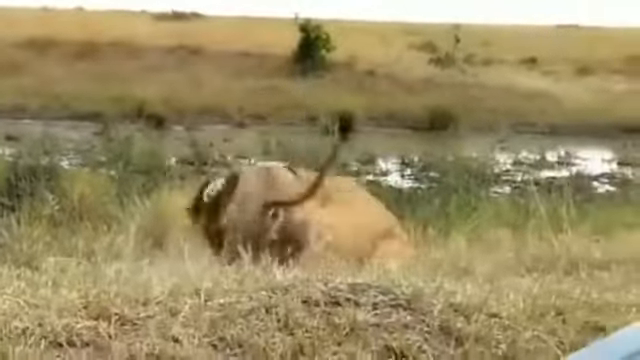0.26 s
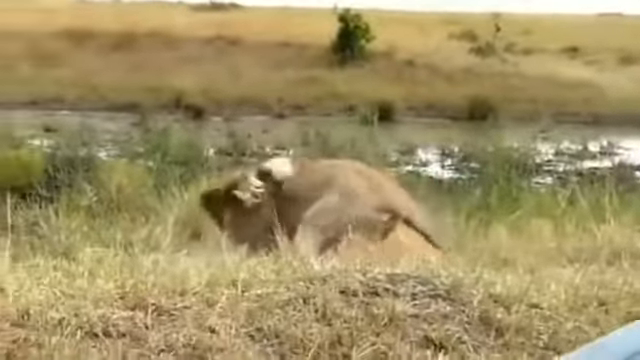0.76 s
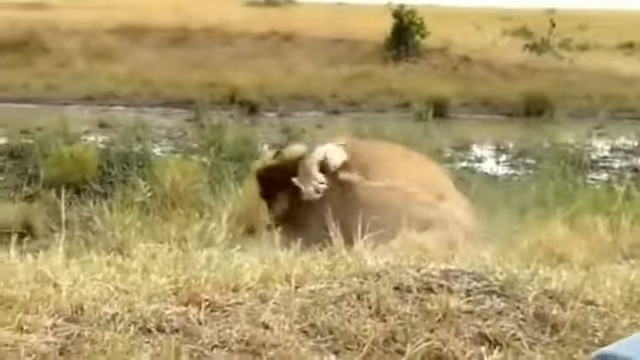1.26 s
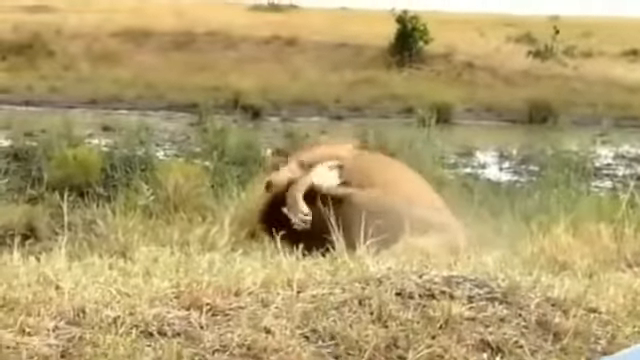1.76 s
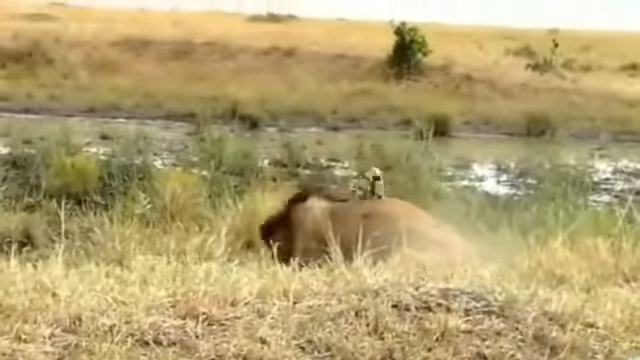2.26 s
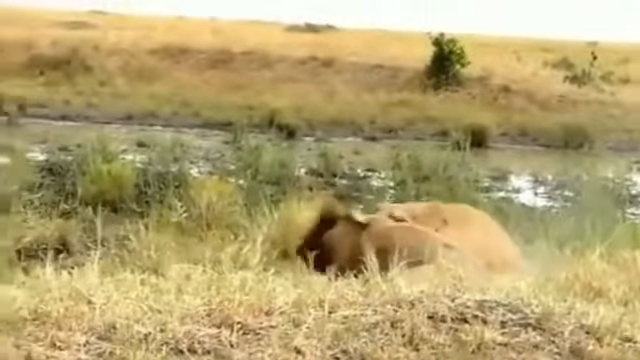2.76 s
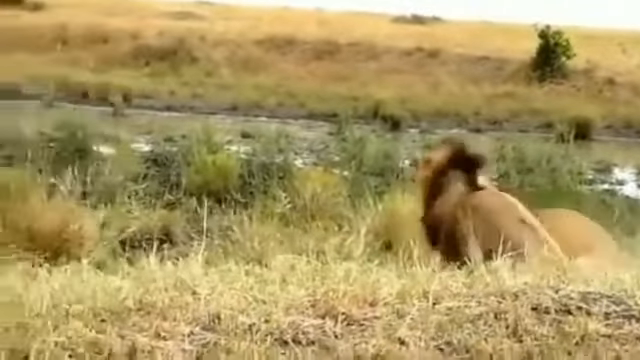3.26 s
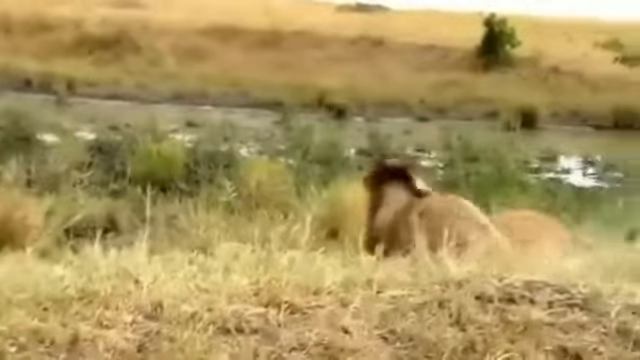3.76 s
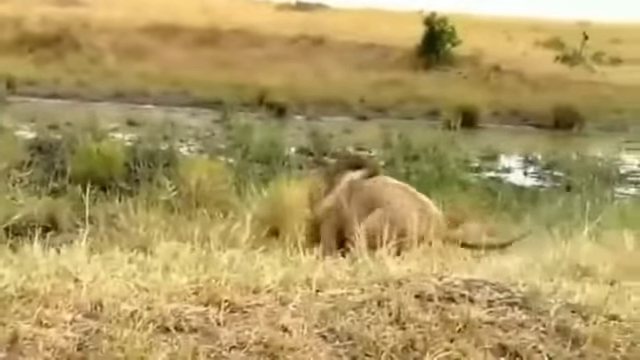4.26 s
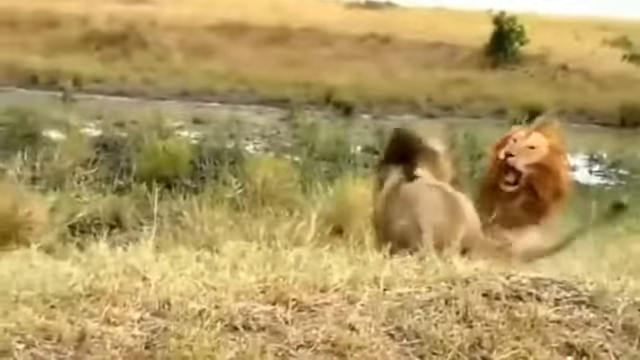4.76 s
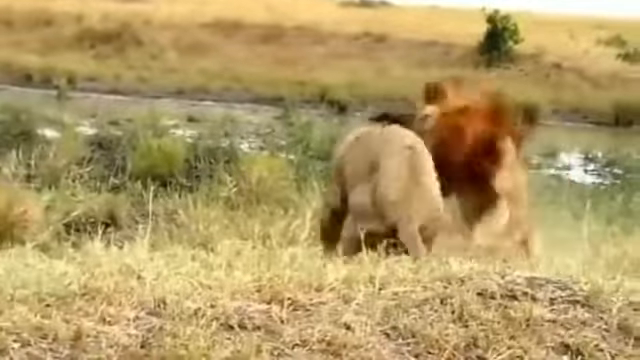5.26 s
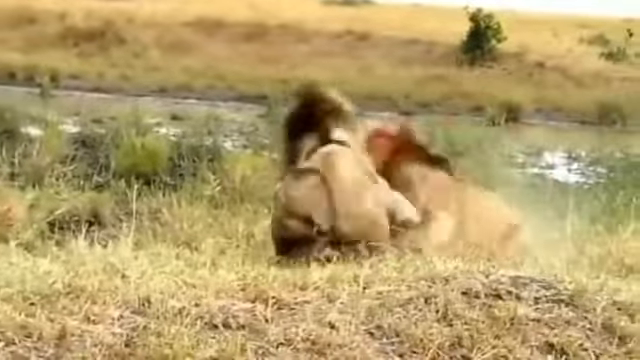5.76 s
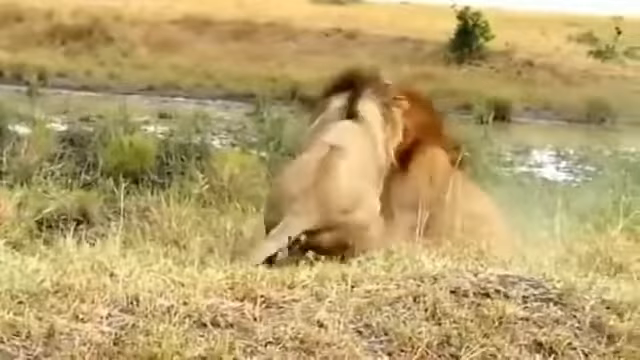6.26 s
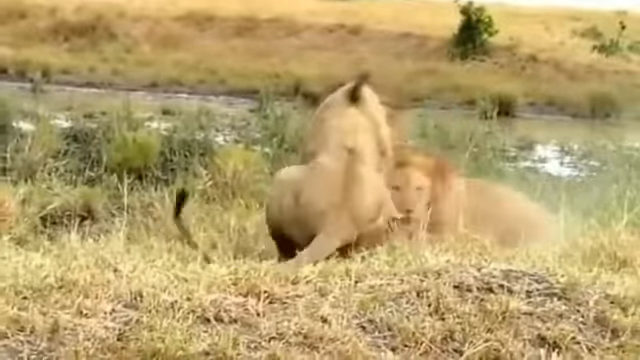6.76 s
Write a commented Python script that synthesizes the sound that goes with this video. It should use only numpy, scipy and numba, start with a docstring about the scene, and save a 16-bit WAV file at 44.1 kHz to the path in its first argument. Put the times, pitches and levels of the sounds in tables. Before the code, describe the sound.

A distant, muffled outdoor capture of fighting big cats. Growls come almost without pause: rough bursts at first, a brief clean rattle, then dense torn roars with yelping, moaning tones. Slow deep rattles follow, with sharp little crackles and brief spitting hisses, before a short dip and more pulsing growls. It ends in strained, raspy snarls and overlapping wails over soft low air noise.

```python
"""Lions fighting on grassland

Two lions fight on open grassland, some way off.
Slow slaps of the vocal folds, now a clean rattle and now a torn roar, ring filters for chest, throat and mouth.
Harmonic moans and wails ride on the growling, with jets of filtered noise for hisses and short bursts for crackles.
The ground adds dull echoes; steady shaped noise lies underneath as a faint hiss and rumble.
"""
import sys
import numpy as np
from scipy import signal
from scipy.fft import rfft, irfft, next_fast_len
from scipy.io import wavfile
from scipy.ndimage import uniform_filter1d, minimum_filter1d
from numba import njit

SR = 44100
rng = np.random.default_rng(int(sys.argv[2]) if len(sys.argv) > 2 else 0)


def master_out(mix):
    """Clip the mix to full scale and print it as 16-bit PCM to the path in sys.argv[1]."""
    frames = np.transpose(np.atleast_2d(mix))
    ceiling = np.clip(frames, -1, 1)
    pcm = np.round(ceiling * 32767).astype(np.int16)
    wavfile.write(sys.argv[1], SR, pcm)


N = 309313
TIME = np.arange(N) / SR
RATTLE_HOLD_S, ROAR_HOLD_S = .085, .03   # windows that even out the level

# one row per stretch of growling, in order of time; a long rattle runs over several rows:
#   (start [s], length [s], fold slaps at start [per s], at end [per s],
#   roughness [0-1], level [dB], swell over its length [dB], jaw opening at start [0-1], at end [0-1],
#   chest pitch at start [Hz], at end [Hz], mouth pitch at start [Hz], at end [Hz],
#   tract damping [factor], depth [dB], hollowness [dB], curl of the lips [dB], rasp [dB])
GROWL_STRETCHES = [ (0, 0.12, 62, 78, 0.56, -18.5, -9, 0.66, 0.71, 327, 298, 715, 654, 0.69, -25, -14, -9, -1),
                   (0.127, 0.19, 68, 59, 0.76, -29.5, 1, 0.82, 0.5, 288, 248, 630, 640, 1.4, -7, -6, 5, -11),
                   (.267, .124, 56, 56, .3, -19.5, 5, .55, .48, 224, 190, 700, 720, 1.1, -3, 0, -8, -6),
                   (.392, .112, 43, 46, .18, -18, 0, .6, .66, 226, 205, 720, 720, 1, 0, -2, -8, -7),
                   (0.503, 0.21, 55.5, 68, 0.52, -14, -1.5, 0.48, 0.62, 178, 235, 727, 734, 1.07, -11, -3.5, -13, -0.5),
                   (0.743, .19, 44.6, 46.5, 0.41, -24, -3, 0, 0, 198, 226, 700, 690, 0.36, -13, -1, -5, 2),
                   (0.926, 0.24, 43.7, 50, 0.38, -22.5, 1.5, 0.64, 0.24, 191, 221, 643, 660, 1.2, -2.5, -14, -7, -8),
                   (1.036, 0.16, 74, 46, 0.66, -31, 19.5, 0, 0.45, 221, 206, 710, 753, 0.89, -1.5, -2, 18.5, 2),
                   (1.145, 0.2165, 79, 69.4, 0.63, -23.5, -0.5, 0.86, 0.36, 304, 296, 770, 760, 2.3, -24, -24, 17.5, -6),
                   (1.378, .095, 29.9, 32.8, .06, -23.5, -2, .28, .28, 310, 320, 700, 700, .75, -14, -17, -11, -12),
                   (1.4735, .09, 31, 23.2, .08, -25, -9, .36, .42, 320, 335, 740, 740, .8, -12, -17, -11, -12),
                   (1.589, 0.11, 64, 78, 0.65, -16, 9, 0.54, .7, 193, 236, 753, 720, 0.92, -12, -9.5, -5, 1),
                   (1.738, 0.2, 71, 81, 0.72, -21.5, -9.5, 0.63, 0.69, 234, 263, 733, 655, 0.83, -4.5, -6.5, 4.5, 1),
                   (1.929, 0.14, 77, 70, 0.65, -25.5, 7.5, 0.25, 0.51, 232, 260, 674, 670, 2.4, -14, -10, 1.5, 7.5),
                   (2.106, 0.23, 71.5, 125, 0.77, -21.5, 6, 0.6, 0.62, 296, 239, 650, 646, 0.62, 0.5, -6, 0, 2.5),
                   (2.284, 0.18, 61.5, 82, 0.81, -20, 1.5, 0.36, 0.75, 258, 268, 626, 695, 0.67, 1, -4.5, 1, 0.5),
                   (2.471, 0.043, 65, 54, 0.62, -27, 7, 0.75, 1, 277, 272, 696, 710, 0.6, -17, 4.5, 11, 7.5),
                   (2.557, 0.13, 92, 80, 0.76, -24, 3, 0.94, 0.82, 340, 350, 680, 723, 0.86, -9.5, -10.5, 8.5, 0),
                   (2.747, 0.2, 116, 93, 0.83, -23, -3, 0.46, 0.66, 186, 213, 710, 687, 1.3, -11.5, -1.5, 10.5, 5.5),
                   (2.918, 0.19, 95, 91, 0.62, -30.5, 7, 0.92, 1, 306, 234, 733, 740, 0.78, -12.5, -38, 3.5, -1),
                   (3.1, 0.44, 55.4, 49.6, 0.63, -26, -4.5, 0.76, 0.26, 228, 182, 783, 670, 0.62, 0, -1, 6, 5),
                   (3.437, .107, 38, 36.6, .25, -25, 4, .16, .1, 216, 225, 640, 620, 1, 1, 7, 2, 0),
                   (3.544, .123, 40.5, 40.6, .2, -21.5, -2, .1, .05, 200, 240, 620, 600, 1, 1, 8, 2, 0),
                   (3.667, .21, 41, 41.5, .2, -19, 4, .08, .12, 245, 206, 680, 650, .7, -2, -5, 0, -2),
                   (3.871, 0.29, 55.5, 60, 0.6, -18.5, -15.5, 0.45, 0.78, 296, 233, 724, 575, 1.4, -3, -16, 6.5, -1),
                   (4.148, 0.14, 50, 38.6, 0.56, -27, -13, 0.43, 0.52, 188, 179, 640, 567, 1.2, 5, -17, -2, -11),
                   (4.355, 0.29, 46, 43.5, 0.86, -25, 8.5, 0.69, 0.53, 182, 185, 584, 580, 1.2, 3, -26, 5.5, 2),
                   (4.6025, .128, 37.5, 40.2, .08, -19, 0, .6, .5, 258, 240, 730, 765, 1, -4, -3, -9, 6),
                   (4.7308, .136, 38.8, 34.6, .06, -19, 0, .5, .46, 232, 232, 770, 780, .85, -5, -3, -10, 6.5),
                   (4.867, .169, 31.5, 39.3, .36, -16.5, 1.5, .32, .6, 226, 218, 700, 760, .9, -4, -1, -6, 4.5),
                   (5.036, .087, 37.5, 31.3, .2, -21, 0, .52, .47, 205, 247, 720, 700, 1, -4, -2, -5, 5),
                   (5.123, .1, 95, 110, .85, -27.5, -6, .85, .6, 295, 290, 770, 680, 1, -4, -3, -1, -5),
                   (5.222, 0.05, 50, 49, 0.7, -37, -6, 0.06, 0, 245, 255, 740, 704, 1.9, 8.5, 6, 18, 9),
                   (5.403, .048, 43, 40, .12, -28.5, 7, .22, .3, 208, 215, 690, 690, .8, -5, -9, -3, 1),
                   (5.451, .05, 38, 38, .08, -21.5, -6, .25, .2, 215, 215, 690, 690, .6, -7, -9, -5, -3),
                   (5.5, 0.028, 32.3, 43, 0.9, -28.5, 2.5, 0.5, 0.72, 197, 200, 600, 620, 0.35, 1, -5, 12, 1),
                   (5.527, .115, 41, 45.8, .08, -16, 2, .16, .22, 200, 182, 540, 680, .5, -6, -1, -6, -5),
                   (5.642, .05, 40.6, 38.8, .04, -16, 0, .3, .38, 186, 196, 700, 800, .55, -7, -4, -7, 2),
                   (5.6922, .096, 38.6, 44.5, .04, -16, 0, .38, .36, 198, 218, 835, 740, .6, -8, -4, -8, 2),
                   (5.7885, .17, 45, 37.2, .05, -18.5, -9, .14, .42, 222, 228, 750, 560, .7, -10, 1, -6, -2),
                   (5.961, 0.18, 44, 53, 0.66, -28.5, -3, 0.28, 0.8, 188, 205, 683, 860, 1.5, 3, -2.5, 8.5, -1),
                   (6.119, .1, 60, 70, .8, -30, -5, .3, .5, 212, 240, 850, 840, 1.2, 4.5, -7, 9, 4),
                   (6.28, .275, 71, 55, .92, -28, 3, .48, .68, 266, 332, 835, 850, .93, 3, -8, 13.5, 11),
                   (6.557, 0.3, 94, 157, 0.81, -28.5, -0.5, 0.57, 0.53, 367, 346, 810, 810, 1.15, 12, -0.5, 16.5, 14.5),
                   (6.842, 0.18, 108, 133, 0.93, -22, -4, 0, 1, 360, 340, 725, 710, 0.54, 2, -5, 10.5, 6)]


def from_db(db):
    """Decibels to gain."""
    return 10 ** (np.asarray(db) / 20)


def rms_one(x):
    """Scale to an rms of 1."""
    return x / np.sqrt(np.mean(x ** 2) + 1e-20)


def glide(first, last, share):
    """A straight move from one value to another."""
    return first + (last - first) * share


def drift(rate_hz):
    """Slow chance with an rms of 1: noise low-passed on a coarse grid, then joined by straight lines."""
    step = 40   # samples between grid points
    pole = np.exp(-2 * np.pi * rate_hz * step / SR)
    noise = rng.standard_normal(N // step + 2002)
    slow = signal.lfilter([1], [1, -2 * pole, pole * pole], noise)[2000:]   # drop the run-in
    return np.interp(np.arange(N) / step, np.arange(len(slow)), rms_one(slow))


def cut(x, hz, kind, order):
    """Butterworth low-pass or high-pass, run both ways so that a slap stays compact."""
    margin = SR // 20
    sos = signal.butter(order, min(hz, SR / 2 - 1), kind, fs=SR, output="sos")
    return signal.sosfiltfilt(sos, np.pad(x, margin), padtype=None)[margin:-margin]


def evened(x, hold_s=RATTLE_HOLD_S):
    """Hold the level near 1 over a short window, keeping the faster slaps within it."""
    window = np.hanning(int(hold_s * SR))
    power = signal.fftconvolve(x ** 2, window / window.sum(), "same")
    return x / np.sqrt(np.abs(power) + 1e-14)


@njit
def resonate(x, hz, width, sr):
    """A ringing resonance, one decaying complex rotation, whose centre and width move."""
    out, state = np.zeros(len(x)), 0j
    for i in range(len(x)):
        w = 2 * np.pi * hz[i] / sr
        state = state * np.exp(-np.pi * width[i] / sr) * complex(np.cos(w), np.sin(w)) + x[i]
        out[i] = state.real
    return out


def noise_bed(level_db=-38):
    """A steady noise bed: shaped into a low rumble and a faint hiss."""
    # colour of the noise bed: (frequency [Hz], relative level [dB])
    air_colour = [(20, -8), (40, -7.5), (70, 1.5), (130, 11), (400, 11), (1500, -9.5), (3000, -26.5),
                  (5000, -34.5), (7800, -35), (9000, -52)]
    hz, db = np.transpose(air_colour)
    size = next_fast_len(N)
    bins = np.maximum(np.fft.rfftfreq(size, 1 / SR), 1)
    colour = from_db(np.interp(np.log(bins), np.log(hz), db))
    noise = irfft(rfft(rng.standard_normal(size)) * colour, size)[:N]
    return from_db(level_db) * rms_one(noise)


def grassland(x, dull_hz=1500, smear_hz=500):
    """Soft ground smears each slap a little and adds only a few dull echoes."""
    # dull returns from ground and bank: (delay [s], level [dB])
    returns = [(.0045, -14), (.071, -25), (.118, -28)]
    pole = np.exp(-2 * np.pi * smear_hz / SR)
    smeared = signal.lfilter([-pole, 1], [1, -pole], x)   # all-pass: the lows lag the highs
    dull = cut(smeared, dull_hz, "low", order=1)
    echoes = sum(from_db(db) * np.interp(TIME - delay, TIME, dull, left=0) for delay, db in returns)
    return smeared + echoes


def crackles():
    """Sharp crackles and snaps: each is a tiny dying noise burst through a bright band-pass."""
    # one row per snap: (time [s], peak level [dB], ring centre [Hz], ring width [Hz], burst decay [s])
    snaps = [ (4.602, -35, 2550, 550, 0.0034), (4.654, -39, 2890, 600, .003),
             (4.867, -42.5, 2850, 550, .002), (4.955, -35.5, 2460, 515, 0.0027),
             (5.036, -42, 2400, 700, .003), (5.063, -40, 1920, 350, .003), (5.091, -39, 2660, 350, .003),
             (5.122, -44, 2720, 404, 0.0025), (5.4393, -45, 2290, 2800, 0.00043),
             (5.743, -46, 2620, 453, .003)]
    out, t = np.zeros(N), TIME[:SR // 30]
    for start, db, hz, width, decay_s in snaps:
        band = np.clip([hz - width / 2, hz + width / 2], 100, SR / 2 - 1)
        burst = rng.standard_normal(len(t)) * np.exp(-t / decay_s)
        rung = signal.sosfilt(signal.butter(2, band, "band", fs=SR, output="sos"), burst)
        out[int(start * SR):][:len(t)] += from_db(db) * rung / np.abs(rung).max()
    return out


def hisses(flutter_db=6.0, fade_s=0.004):
    """Air spat through bared teeth: noise rings the same gliding resonance twice, and its level flutters."""
    # one row per jet: (start [s], length [s], level [dB], centre at start [Hz], at end [Hz],
    #   width of each resonance [Hz])
    jets = [ (0.178, 0.089, -59, 1850, 1730, 300), (0.509, 0.24, -47.5, 1240, 1360, 300),
            (1.479, 0.023, -46, 1000, 960, 90), (2.917, 0.11, -50.5, 2120, 1950, 220),
            (5.124, .08, -40, 1280, 1010, 150), (5.498, 0.089, -53.5, 1600, 1450, 700),
            (5.507, 0.018, -57.5, 2280, 2250, 200), (6.45, .55, -66, 3340, 3470, 1100)]
    out, flutter = np.zeros(N), from_db(flutter_db * drift(60))
    for start, length, db, first_hz, last_hz, width in jets:
        on = (TIME >= start) & (TIME <= start + length)
        t = TIME[on] - start
        hz = glide(first_hz, last_hz, t / length)
        widths = np.full(len(t), float(width))
        jet = resonate(rng.standard_normal(N)[on], hz, widths, float(SR))
        jet = resonate(jet, hz, widths, float(SR))
        fade = np.clip(np.minimum(t, length - t) / fade_s, 0, 1)
        out[on] += from_db(db) * fade * rms_one(jet * flutter[on])
    return out


def cries(flutter_db=3.0, fade_s=0.01, tear=.012, top_hz=2300, shrill_octaves=0.41):
    """Taut folds sing a quavering stack: three low harmonics, and a cluster a tight mouth lets out clean."""
    # moans, yelps and wails, each row one arc of pitch: (start [s], length [s], pitch at start [Hz],
    #   in the middle [Hz], at end [Hz], swell over its length [dB], fundamental [dB], second harmonic [dB],
    #   third harmonic [dB], shrill overtones [dB], their centre [Hz], quaver [share of the pitch])
    wails = [ (0, 0.15, 286.7, 307, 278, 5.5, -27.5, -31, -39.5, -52, 1250, .02),
             (.748, 0.14, 275, 293, 237, 5.5, -36, -43, -52, -50.5, 1250, .006),
             (.918, 0.11, 226.7, 228, 252, 11, -37, -33.5, -39, -50, 1100, .0082),
             (1.041, .15, 215, 260, 322, 7, -26.5, -35, -58, -46.5, 1050, .021),
             (1.209, 0.16, 326.2, 330, 310, -9, -30.5, -53, -36, -60, 1250, 0.04),
             (1.76, 0.11, 239.2, 248, 250, -6, -47, -36, -30, -46, 1400, .015),
             (1.921, 0.093, 229, 222, 208, -4, -30, -45, -37, -58, 1400, .011),
             (2.039, 0.14, 221, 213, 260, 9, -39, -33, -33, -67, 1400, .024),
             (2.259, .2, 268.4, 274, 248, 8, -24.5, -36, -45, -51.5, 1200, .017),
             (2.362, 0.16, 345, 350, 384, 6.5, -40, -30, -41.5, -49.5, 1400, .015),
             (2.374, 0.14, 416, 414, 400, -20, -27, -48, -61, -63, 1400, .012),
             (2.547, 0.055, 526, 532, 680, 7, -21, -36, -53.5, -59, 1600, .045),
             (2.595, 0.088, 352.6, 378, 390, -3, -33.5, -28, -33.5, -45, 1450, .018),
             (2.756, .17, 220, 222, 230, 8, -44, -30, -32.5, -50.5, 1150, .0075),
             (2.913, 0.068, 358, 372, 300, -1, -43, -30.5, -33, -42, 1500, .018),
             (2.951, 0.066, 316, 313, 287, -1, -26.5, -44, -36.5, -46, 1600, .015),
             (2.998, 0.074, 232.5, 217, 243, 2, -34.5, -55, -28, -29, 900, .016),
             (3.17, 0.18, 436, 465, 470, -14, -34.5, -45, -71, -57, 1400, .008),
             (3.3, 0.18, 538.3, 505, 490, 0, -31, -40.5, -65, -67, 1400, .0054),
             (3.473, 0.054, 492, 420, 400, 0, -29, -48.5, -52, -64, 1400, .01),
             (3.532, .11, 375, 390, 445, 1, -26.5, -58, -57, -61, 1400, .025),
             (3.72, 0.1, 526, 475, 450, 2, -40.5, -50, -64, -68, 1400, .008),
             (3.944, 0.18, 336.3, 300, 272, 1, -39.5, -34.5, -34.5, -47.5, 1200, .022),
             (4.154, 0.18, 289, 274, 240, -4, -41.5, -41, -61, -68, 1400, .0064),
             (4.363, 0.068, 317.5, 320, 284, 3, -36, -31.5, -37.5, -59, 1400, .025),
             (5.119, 0.073, 289.5, 294, 284, -6, -28, -38, -49, -51, 1150, .02),
             (5.192, 0.097, 422.5, 415, 410, -2, -32.5, -48.5, -54, -68, 1400, .0087),
             (5.288, 0.16, 325, 280, 260, 2, -45, -63, -59, -73.5, 1400, .01),
             (6.054, 0.099, 216.6, 236, 300, 17, -53, -52, -44, -41.5, 1300, .015),
             (6.138, .07, 290, 270, 296, 0, -37, -46, -34, -36, 1350, .006),
             (6.192, .09, 286, 305, 315, 0, -37, -46, -37, -35.5, 1330, .005),
             (6.258, .078, 368, 378, 392, 2, -30, -33, -34, -49, 1700, .009),
             (6.31, .135, 268, 291, 272, 4, -41, -50, -37, -38, 1500, .022),
             (6.325, 0.14, 385.7, 412, 443, -4, -29.5, -31, -36, -40, 1600, 0.026),
             (6.43, .135, 292, 274, 292, -1, -39, -50, -37, -41, 1500, .035),
             (6.435, 0.16, 427, 426, 450, 1.5, -30.5, -38, -41, -42, 1560, .024),
             (6.562, .095, 391, 380, 325, 0, -25, -34, -46, -38, 1500, .015),
             (6.659, 0.21, 470, 476, 380, -2, -44, -50, -41, -41.5, 1790, 0.02),
             (6.655, 0.15, 318, 324, 374, 8.5, -29.5, -37.5, -51, -33.5, 1280, 0.027),
             (6.889, 0.12, 332.6, 378, 336, 6, -31.5, -36.5, -59, -39, 1500, .022)]
    out, waver, torn = np.zeros(N), drift(130), drift(350)
    flutter = from_db(flutter_db * np.array([drift(67) for _ in range(4)]))   # one per voice
    orders = np.arange(1, 11)[:, None]
    for start, length, first_hz, middle_hz, last_hz, swell_db, *levels_db, shrill_hz, quaver in wails:
        on = (TIME >= start) & (TIME <= start + length)
        t = TIME[on] - start
        parabola = np.polyfit([0, 1 / 2, 1], [first_hz, middle_hz, last_hz], 2)
        arc = np.polyval(parabola, t / length)
        pitch = arc * np.exp(quaver * waver[on] + tear * torn[on])
        phase = orders * 2 * np.pi * np.cumsum(pitch) / SR
        partials = np.sqrt(2) * np.cos(phase + rng.uniform(0, 2 * np.pi, orders.shape))
        passed = np.exp(-(np.log2(orders * pitch / shrill_hz) / shrill_octaves) ** 2)
        shrill = rms_one((passed * partials)[3:].sum(axis=0))
        voices = np.vstack([partials[:3], shrill])
        fade = np.clip(np.minimum(t, length - t) / fade_s, 0, 1)
        envelope = fade * from_db(swell_db * (t / length - .5))
        out[on] += envelope * (from_db(levels_db) @ (voices * flutter[:, on]))
    return cut(out, top_hz, "low", order=5)


def folds(rough, jitter=.2, uneven_db=6.0, leak=0.92, clean_puff=.14, torn_puff=1.0):
    """Slaps of the vocal folds, quickening or slowing along each row, and turbulent air puffed after each slap."""
    starts, lengths, first, last = np.transpose(GROWL_STRETCHES)[:4]
    row = np.maximum(np.searchsorted(starts, TIME) - 1, 0)   # the latest row to begin
    rate = glide(first[row], last[row], np.clip((TIME - starts[row]) / lengths[row], 0, 1))
    turns = np.cumsum(rate * np.exp(jitter * rough ** 2 * drift(40))) / SR
    for start in np.maximum((starts * SR).astype(int), 1):   # each row restarts the cycle
        turns[start:] -= turns[start]
    cycle = turns % 1
    slap = np.diff(cycle, prepend=0) < 0
    slaps = slap * np.sqrt(SR / rate)   # about equal power at any rate
    force = from_db(uneven_db * np.sqrt(rough * (1 - rough)) * drift(37))   # most uneven when half torn
    # clean folds let out a short puff; torn folds never quite close
    opening = leak * rough ** 2 + np.exp(-cycle / (clean_puff + torn_puff * rough))
    puffs = evened(opening) * rng.standard_normal(N)
    return force * slaps, force * puffs


def tract_motion(attack_s=0.019, release_s=0.019, arch_db=2.5, lead_s=0.00043, rasp_curl=0.37):
    """Each stretch swells, arches and dies while jaw and larynx glide: returns the gain of every resonance
    and the blended roughness, chest pitch, mouth pitch and damping."""
    # opening the jaw trades low resonances for high ones, belly to rasp; the first eight rows are used:
    #   (level with jaw shut [dB], level wide open [dB])
    jaw_trade = [(-5, -17.5), (-3.5, -13), (-4.5, -11), (-17, -2.5), (-24.5, 2), (-35, -13), (-30, -14),
                 (-36.5, -14.5), (-45, -25), (-37, -34.5)]
    shut_db, open_db = np.transpose(jaw_trade[:8])[:, :, None]
    power, pose, weight = np.zeros((8, N)), np.zeros((4, N)), np.zeros(N)
    for (start, length, _, _, rough, db, swell_db, jaw0, jaw1, chest0, chest1, mouth0, mouth1,
         damping, depth, hollow, curl, rasp) in GROWL_STRETCHES:
        on = slice(*np.searchsorted(TIME, [start - .12, start + length + .18]))   # room for the soft edges
        t = TIME[on] - start
        share = np.clip(t / length, 0, 1)
        rise = (1 + np.tanh((t + lead_s) / attack_s)) / 2   # leads the start slightly
        fall = (1 + np.tanh((length - t) / release_s)) / 2
        gate = rise * fall + 1e-12
        jaw = np.clip(glide(jaw0, jaw1, share), 0, 1)
        effort_db = db + swell_db * (share - .5) - arch_db * (2 * share - 1) ** 2
        # belly, chest, neck, throat, mouth, snarl, teeth, rasp
        colour_db = np.array([depth, 0, hollow / 2, hollow, 0, 0, curl, rasp_curl * curl + rasp])[:, None]
        power[:, on] += gate * from_db(effort_db + colour_db + glide(shut_db, open_db, jaw)) ** 2
        chest_hz, mouth_hz = glide(chest0, chest1, share), glide(mouth0, mouth1, share)
        pose[:, on] += gate * np.array(np.broadcast_arrays(rough, chest_hz, mouth_hz, damping))
        weight[on] += gate
    return np.sqrt(power), pose / (weight + 1e-30)


def growling(wobble_db=5.0, torn_widening_hz=84):
    """Slaps and puffs ring eight resonances of the vocal tract, each band-limited and held even in level."""
    # resonances belly, chest, neck, throat, mouth, snarl, teeth, rasp; the first eight rows are used:
    #   (width before damping [Hz], lower edge [Hz], upper edge [Hz], level [dB])
    tract = [(41, 81, 176, -2), (28.8, 110, 374, 0), (69, 363, 372, -3), (203, 393, 506, -0.5),
             (109, 400, 1204, -0.5), (114, 700, 1630, -3), (184.7, 390, 1290, -7), (386, 520, 2920, -16.5),
             (80, 1500, 2300, 0), (1100, 1900, 4100, -5.5)]
    # least turbulence in each resonance, in the same order, first eight used: (share [0-1])
    least_turbulence = [.1, .05, .3, .35, .4, .4, .65, .7, .7, .7]
    gains, (rough, chest_hz, mouth_hz, damping) = tract_motion()
    rough = np.clip(rough, 0, 1)
    slaps, puffs = folds(rough)
    belly_hz, neck_hz, teeth_hz, rasp_hz = 177, 309.3, 1658, 2055
    # one tube: throat and snarl glide with the mouth resonance
    throat_hz, snarl_hz = 0.84 * mouth_hz, 1.586 * mouth_hz
    centres = [belly_hz, chest_hz, neck_hz, throat_hz, mouth_hz, snarl_hz, teeth_hz, rasp_hz]
    out = np.zeros(N)
    for hz, gain, (width, low, high, trim_db), turbulence in zip(centres, gains, tract, least_turbulence):
        torn = np.clip(np.hypot(rough, turbulence), 0, 1)   # a rough voice trades slaps for turbulence
        source = np.sqrt(1 - torn ** 2) * slaps + torn * puffs
        widths = damping * (width + torn_widening_hz * rough)   # folds that stay open shorten the ring
        rung = resonate(source, hz * np.ones(N), widths, float(SR))
        rung = cut(cut(rung, low, "high", order=3), high, "low", order=5)
        # a full roar is dense and steady
        held = glide(evened(rung), evened(rung, ROAR_HOLD_S), rough ** 2)
        out += held * gain * from_db(trim_db + wobble_db * np.sqrt(rough) * drift(8.1))
    return out


def scene():
    """The fight in the open, eased in and out over the steady noise bed."""
    ease = np.clip(np.minimum(TIME, TIME[-1] - TIME) / .004, 0, 1)
    fight = growling() + cries() + hisses() + crackles()
    return (grassland(fight * ease) * ease + noise_bed())[None]


def record(dry, ceiling=0.265, cutoff_hz=8150):
    """A fast limiter holds the peaks down, then a steep low-pass cuts the top."""
    needed = np.minimum(1, ceiling / (np.abs(dry) + 1e-9))
    gain = minimum_filter1d(needed, size=300)
    gain = uniform_filter1d(uniform_filter1d(gain, size=150), size=150)
    return signal.sosfilt(signal.ellip(10, .1, 80, cutoff_hz, fs=SR, output="sos"), dry * gain)


dry = scene()
out = record(dry)
master_out(out)
```